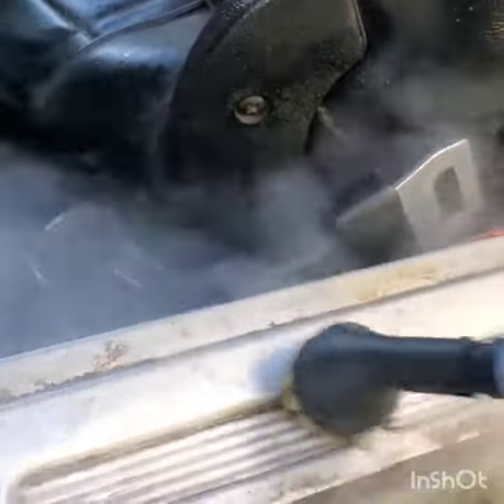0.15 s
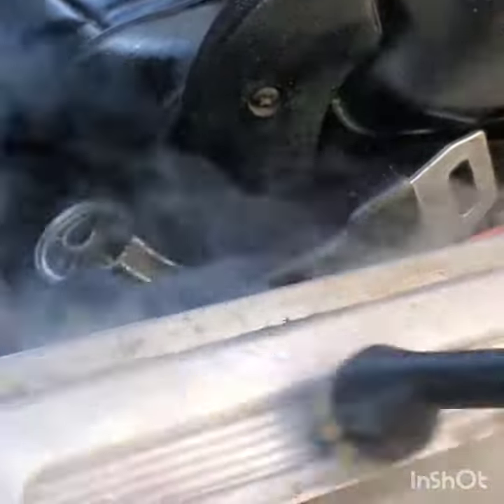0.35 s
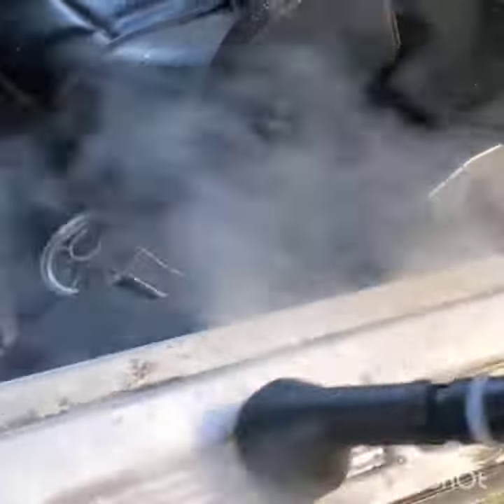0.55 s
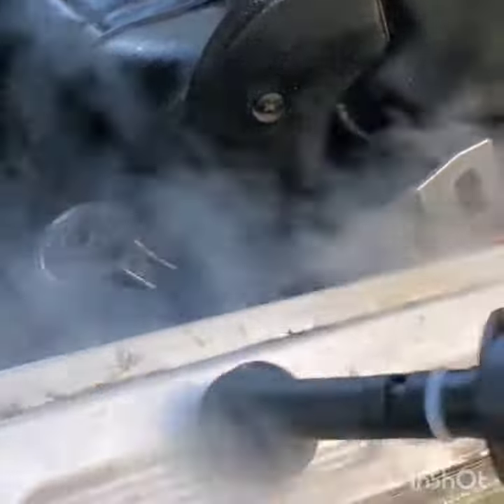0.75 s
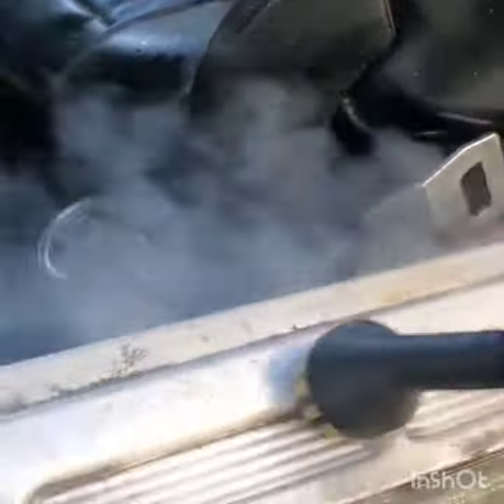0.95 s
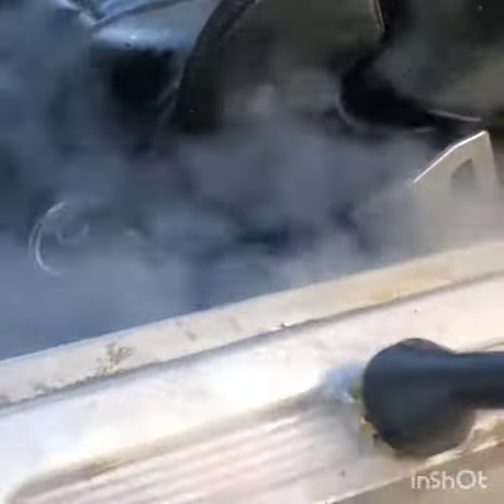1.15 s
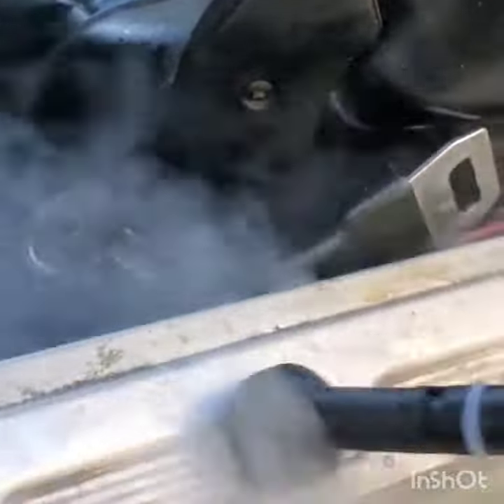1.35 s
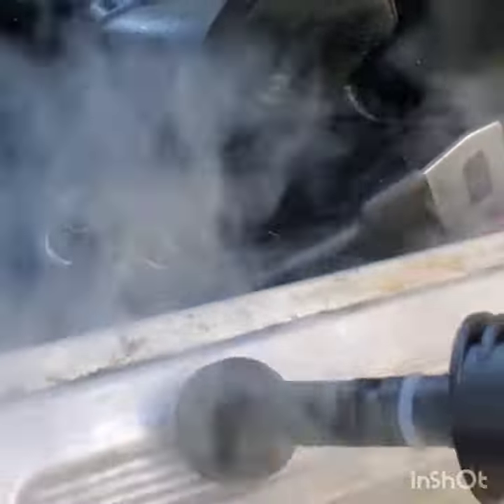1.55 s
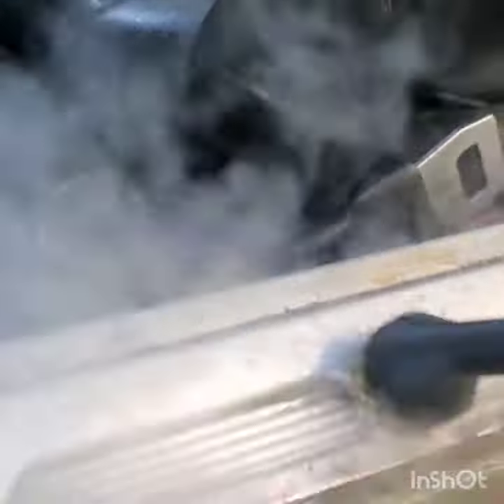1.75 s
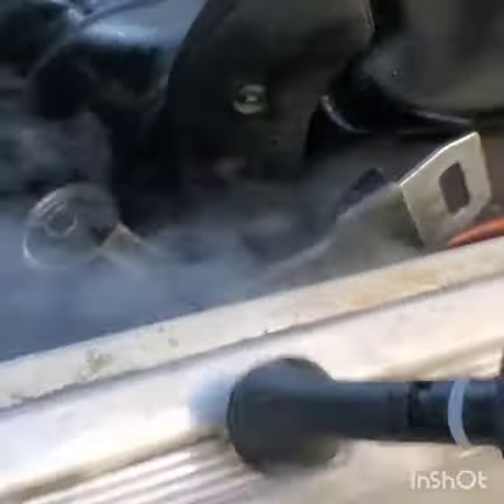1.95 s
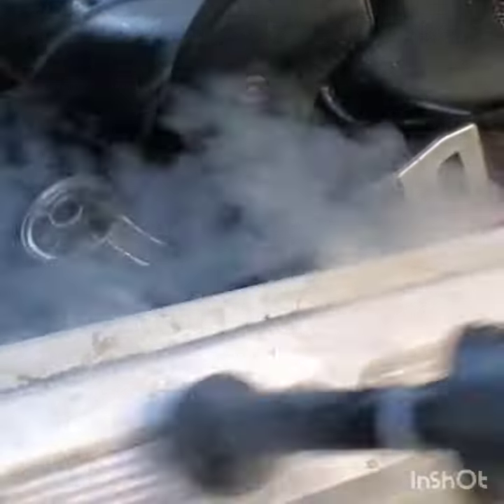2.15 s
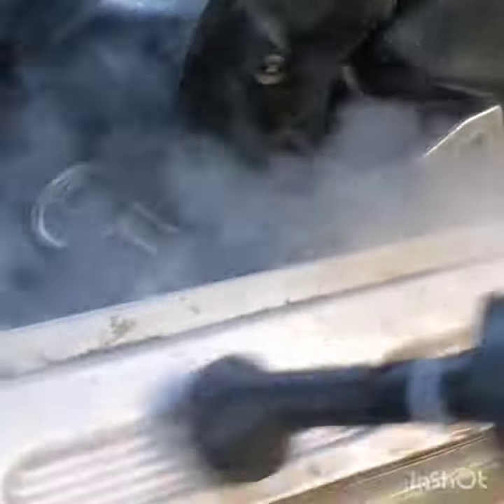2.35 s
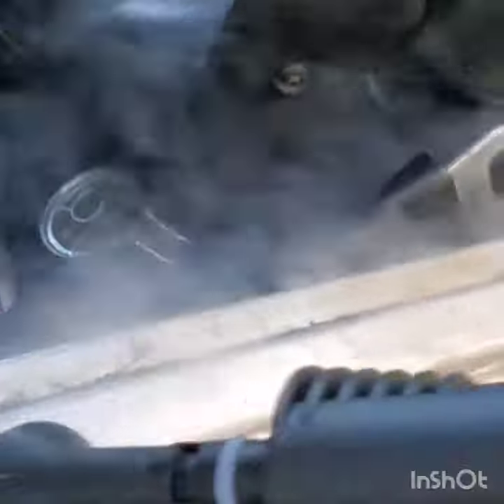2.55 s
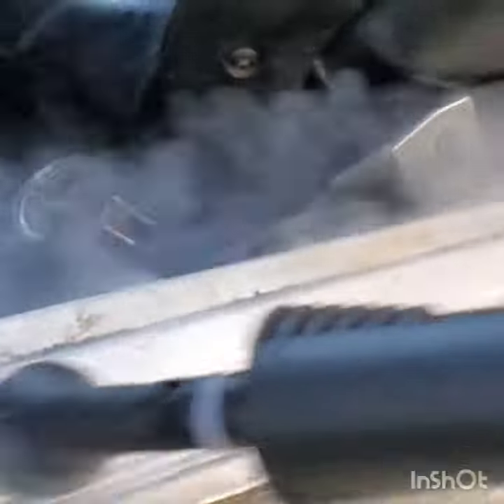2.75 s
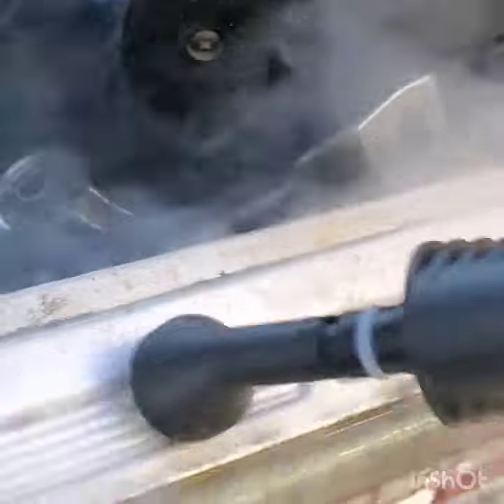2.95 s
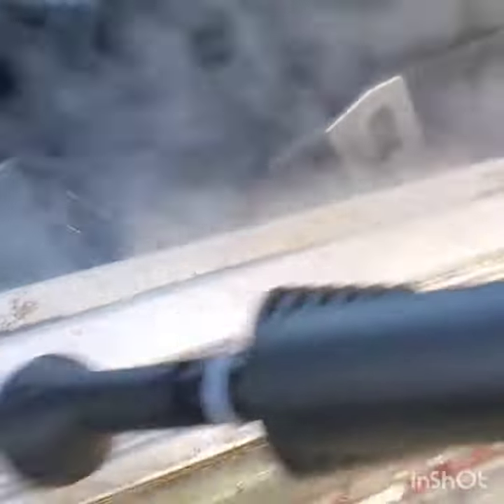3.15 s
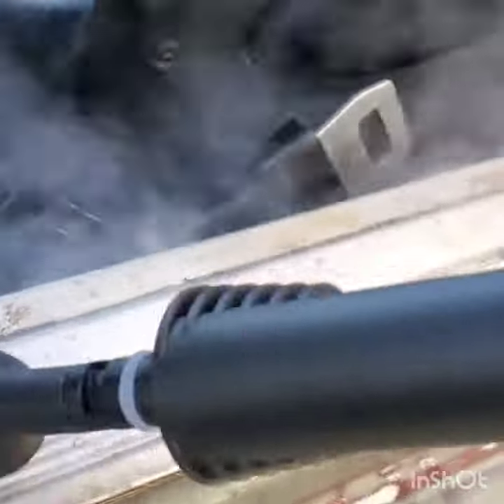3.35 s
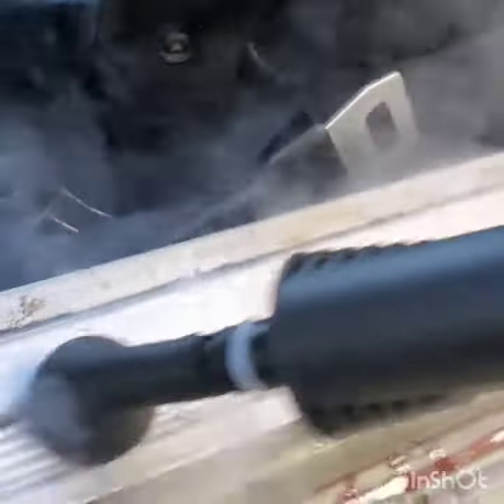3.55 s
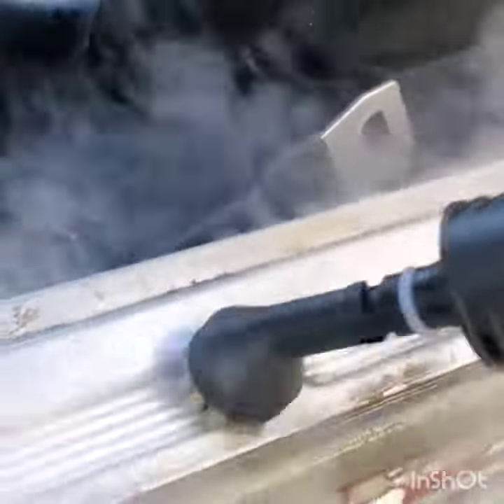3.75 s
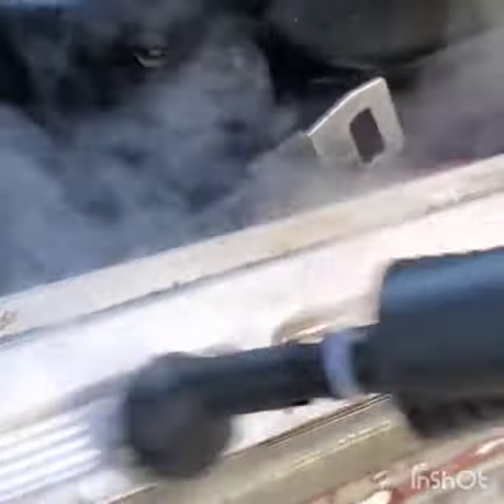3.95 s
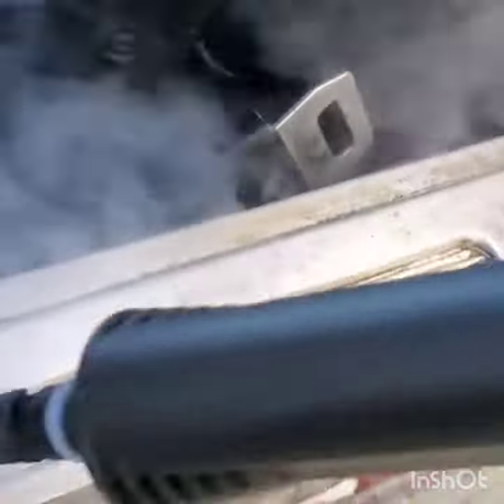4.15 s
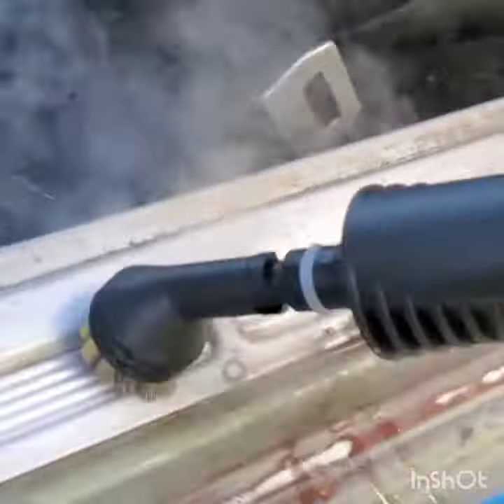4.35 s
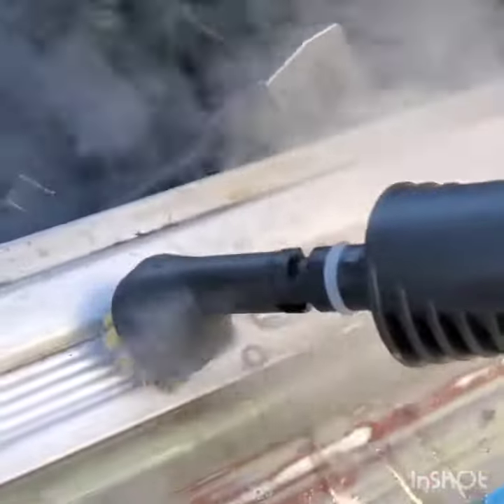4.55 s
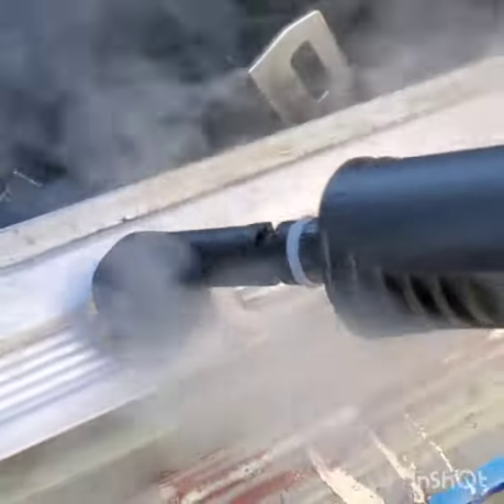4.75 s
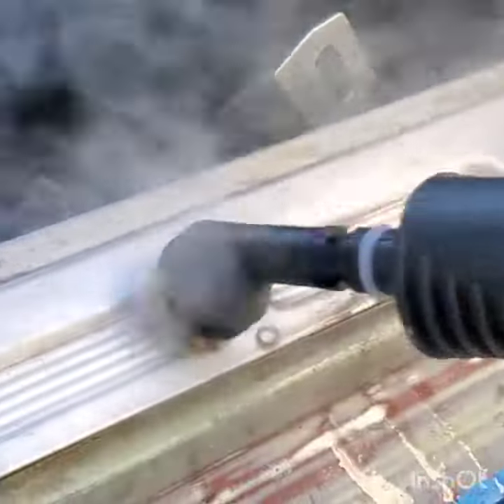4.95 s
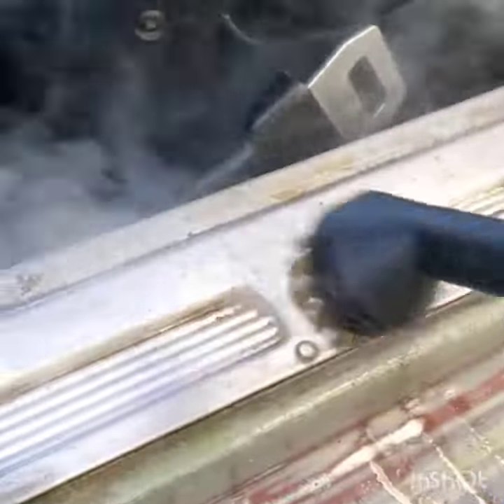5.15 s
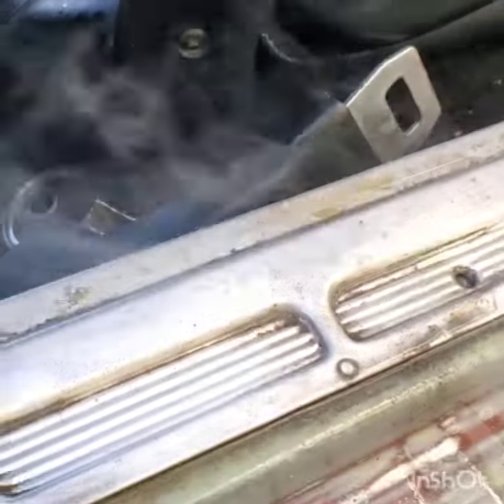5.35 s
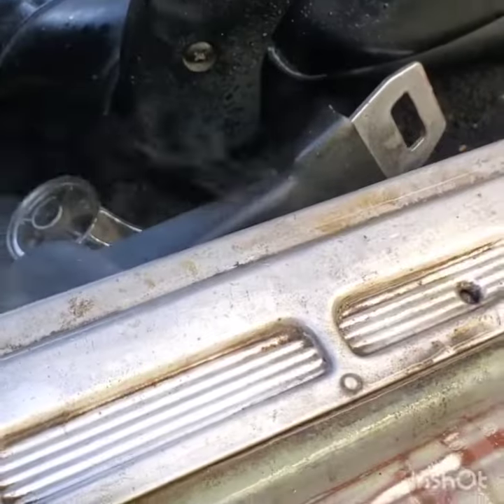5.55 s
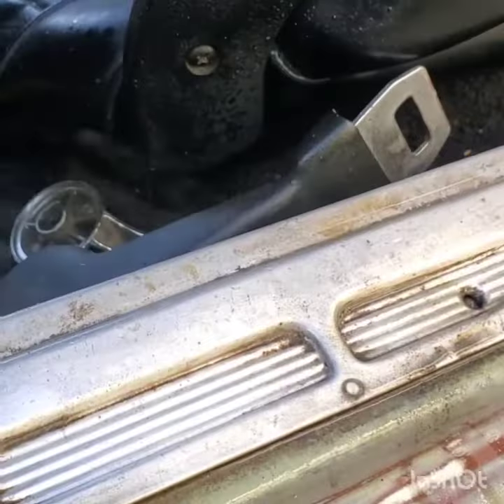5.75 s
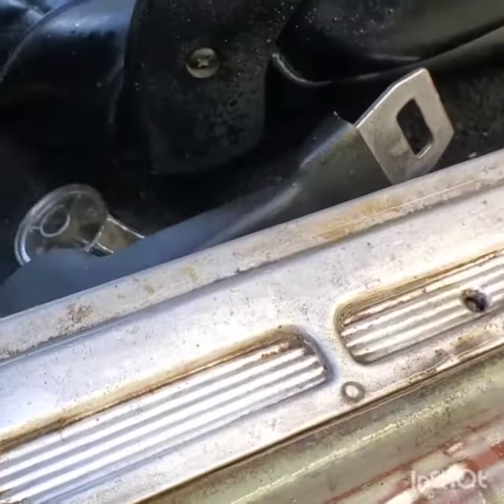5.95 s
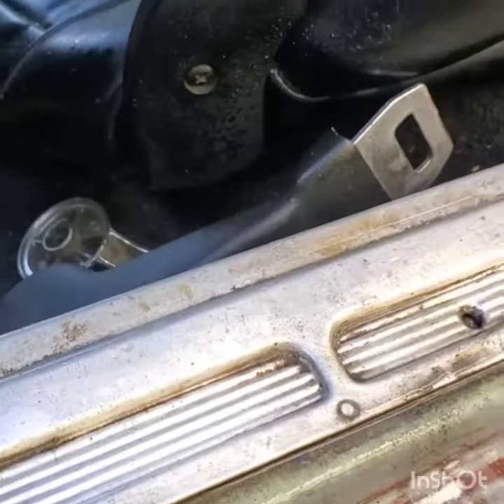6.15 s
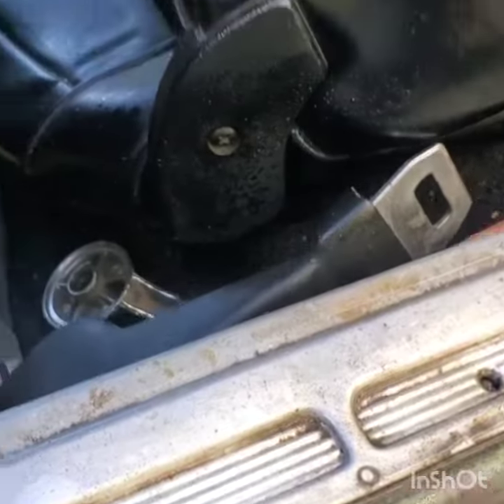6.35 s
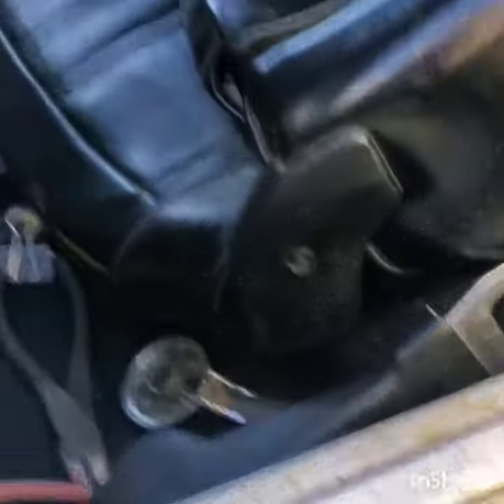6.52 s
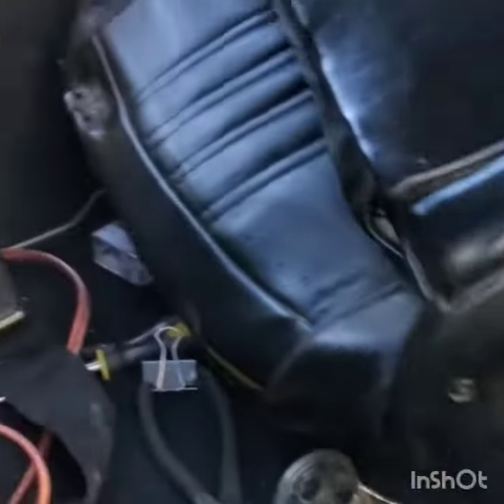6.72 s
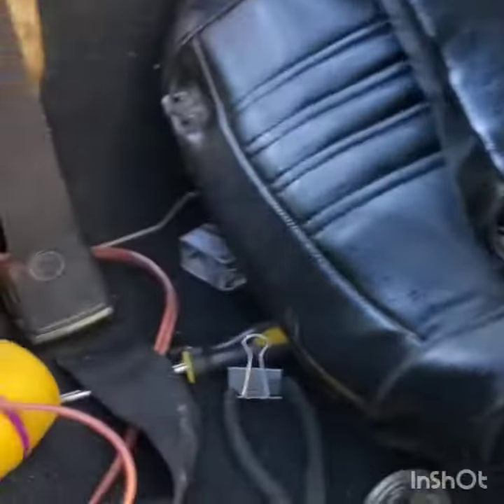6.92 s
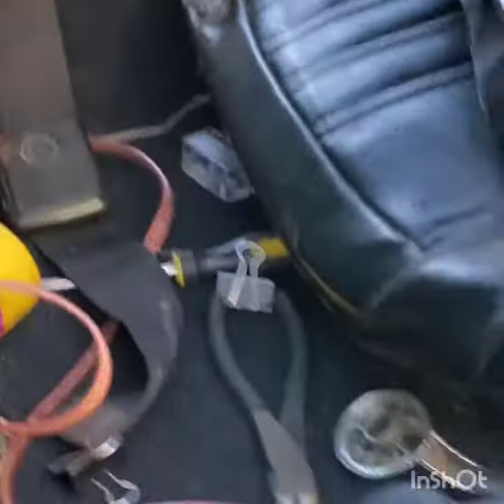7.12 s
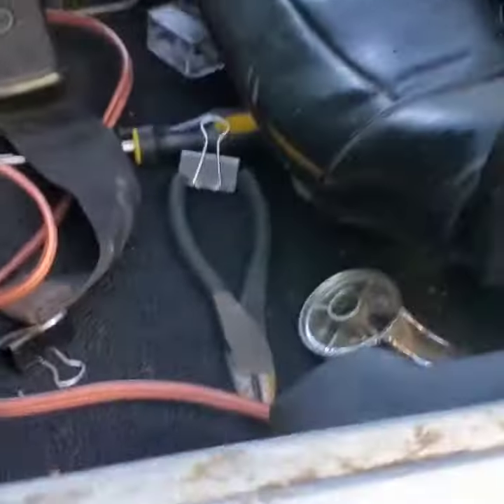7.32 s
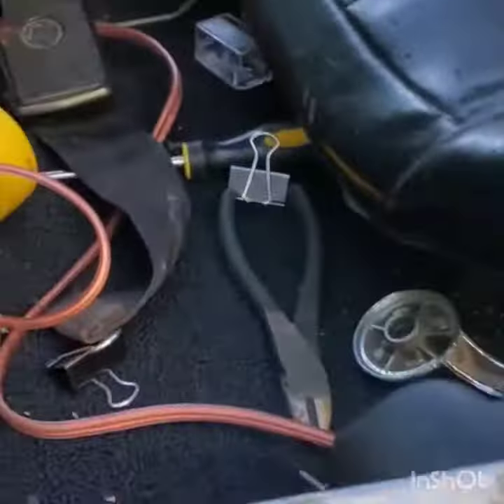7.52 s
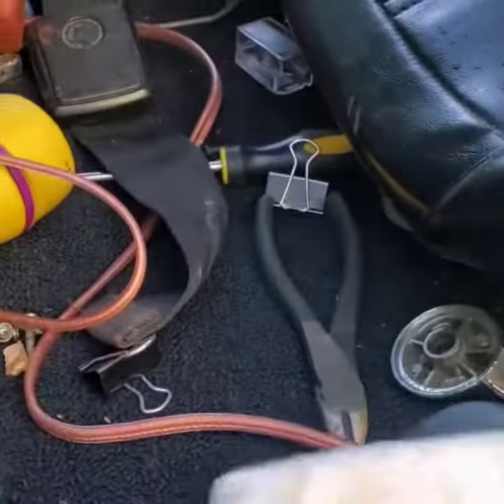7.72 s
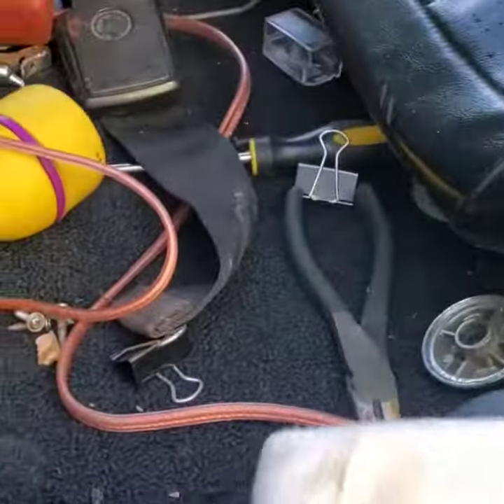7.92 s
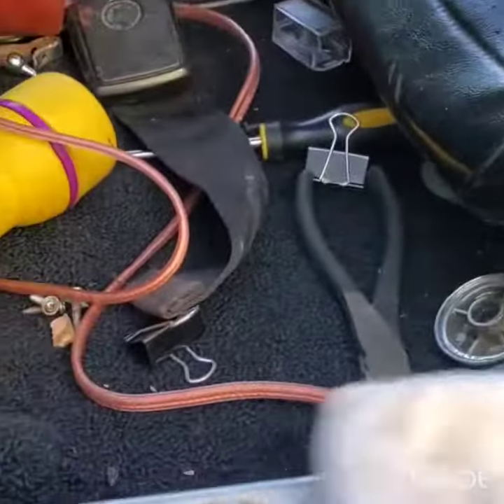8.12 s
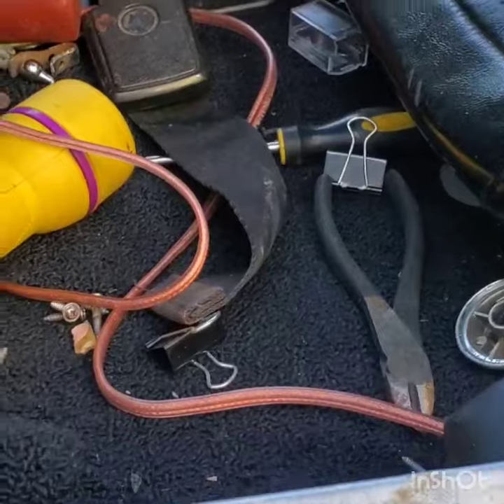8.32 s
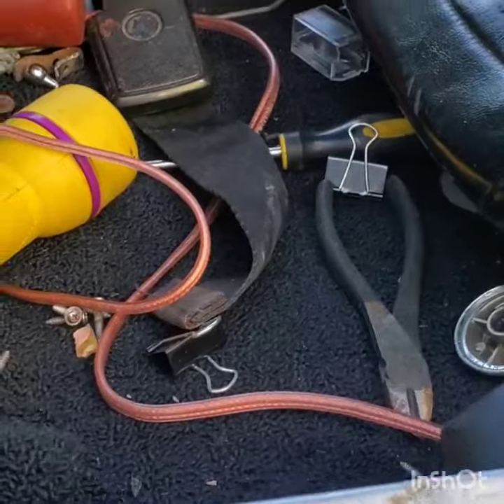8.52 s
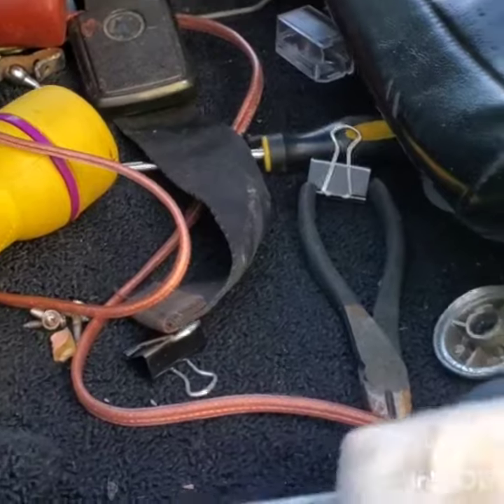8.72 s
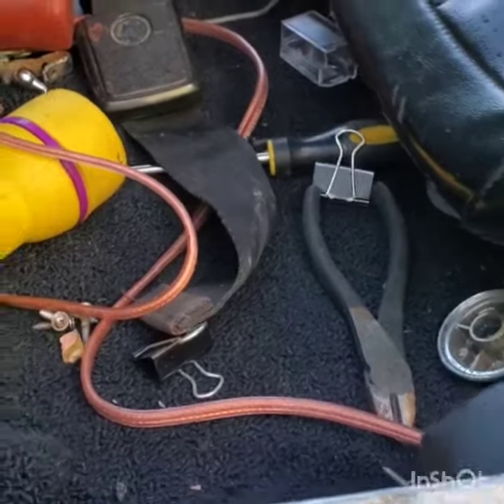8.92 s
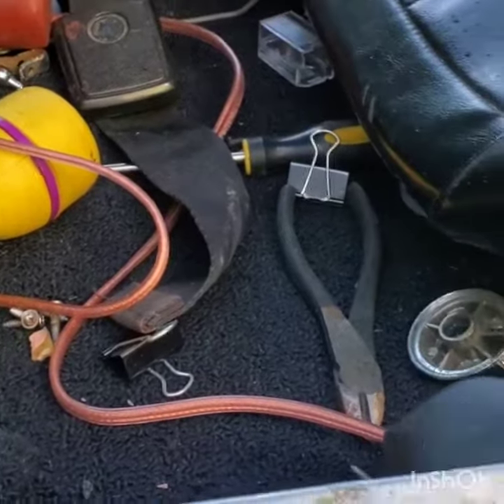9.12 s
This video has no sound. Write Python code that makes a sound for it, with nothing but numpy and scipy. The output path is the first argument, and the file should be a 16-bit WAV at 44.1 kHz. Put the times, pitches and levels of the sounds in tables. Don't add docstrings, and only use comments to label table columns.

```python
import sys
import numpy as np
from scipy import signal
from scipy.fft import rfft, irfft
from scipy.io import wavfile
from scipy.ndimage import uniform_filter1d

SR = 44100
rng = np.random.default_rng(int(sys.argv[2]) if len(sys.argv) > 2 else 0)


def gain_from_db(level_db):
    decades = np.asarray(level_db, float) / 20
    return 10 ** decades


def log_audio(samples):
    frames = np.atleast_2d(samples).T
    limited = np.clip(frames, -1, 1)
    pcm = np.round(limited * 32767).astype(np.int16)
    wavfile.write(sys.argv[1], SR, pcm)


N = 404829

HOP = 128
HZ = np.fft.rfftfreq(4 * HOP, 1 / SR)[:, None]
FRAME_S = np.arange(N // HOP + 5) * HOP / SR
TIME = np.arange(N) / SR

# t/s, jet level/dB
PRESSURE = [
    (0, -24.5),
    (.08, -23),
    (.6, -22.5),
    (1.3, -23),
    (2.3, -22),
    (3.0, -23.5),
    (3.9, -23),
    (4.74, -21.5),
]
# hardest drag t/s, drag level/dB, reach as shortened echo/ms, back-swing surge/dB, turn fizz/dB
STROKES = [(.18, -47, .07, 0, 4.5), (.44, -48.5, .09, 1, -1), (.72, -43.5, .07, 1, 0),
           (.98, -47.5, .04, 1.5, 2), (1.28, -42, .07, 0.5, 2), (1.53, -41, .07, 0.5, -0.5),
           (1.71, -44, 0., 0, 1.5), (1.82, -43, .05, 0.5, -1), (2.16, -41, .19, 1, 2.5),
           (2.44, -37.5, .17, 2, 2), (2.72, -38.5, .1, 2, 1.5), (2.99, -40, .09, 2, 5),
           (3.26, -40.5, .09, 2, 4.5), (3.53, -39.5, .06, 2, -1), (3.82, -48.5, .08, 2, -2.5),
           (3.98, -40, 0., -1, 2.5), (4.12, -56.5, .14, 0., -5.5), (4.26, -47, 0., -0.5, 0.5),
           (4.52, -47.5, 0., -1, -5.5)]
SEEP_S = 4.875


def evened(x):
    return x / np.sqrt(np.mean(x ** 2) + 1e-20)


def read(points, column=1):
    rows = np.array(points)
    return np.interp(np.log(HZ + 1), np.log(rows[:, 0] + 1), rows[:, column])


def curve(rows, x, column=1):
    rows = np.array(rows)
    return np.interp(x, rows[:, 0], rows[:, column])


def bump(t, s, half):
    return np.exp(-((t - s) / half) ** 2)


def gate(rows, fade):
    return np.clip(np.minimum(TIME - rows[0][0], rows[-1][0] - TIME) / fade + 1, 0, 1)


def blotches(wide, long):
    field = rng.standard_normal((len(FRAME_S), len(HZ))).T
    for _ in range(2):
        field = uniform_filter1d(field, max(int(wide), 1), 0)
        field = uniform_filter1d(field, max(int(long), 1), 1)
    return evened(field)


def noise(left, right, same):
    a, b, c, d = rng.standard_normal((len(FRAME_S), len(HZ), 4)).T
    same = np.clip(same, -1, 1)
    shared, own = a + 1j * b, c + 1j * d
    z = np.array([left * shared, right * (same * shared + np.sqrt(1 - same ** 2) * own)])
    return signal.istft(z, nperseg=4 * HOP, noverlap=3 * HOP)[1][:, :N]


def band_rms(x, lo_hz, hi_hz):
    band = signal.butter(4, [lo_hz, hi_hz], "bandpass", fs=SR, output="sos")
    return np.std(signal.sosfilt(band, x.mean(0)))


def steam_gain():
    # t/s, level/dB, half length/s
    cough_rows = [
        (4.752, -30.5, 0.0064),
        (4.77, -24.5, 0.0033),
        (4.795, -23.5, 0.0095),
        (4.813, -26.5, .006),
        (4.827, -25, .006),
        (4.847, -29, 0.0044),
        (4.864, -30, 0.0048),
        (4.888, -47, 0.0044),
        (4.92, -61, .006),
    ]
    surge_late_s, surge_s, smother_db = 0.027, .045, -0.12
    drain_from_db, drain_db_per_s = -34, -66.5
    seep_from_db, seep_db_per_s = -50.5, -150
    sway_db = 0
    for before, (s, _, _, surge_db, _) in zip(STROKES, STROKES[1:]):
        sway_db += surge_db * bump(FRAME_S, (before[0] + s) / 2 + surge_late_s, surge_s)
        sway_db += smother_db * bump(FRAME_S, s, surge_s)
    valve_db = curve(PRESSURE, FRAME_S) + sway_db
    open_valve = gain_from_db(np.interp(TIME, FRAME_S, valve_db)) * gate(PRESSURE, .006)
    coughs = sum(gain_from_db(db - 1.9 * ((TIME - s) / half) ** 2) ** 2 for s, db, half in cough_rows)
    drain_db = drain_from_db + drain_db_per_s * abs(TIME - PRESSURE[-1][0])
    seep_db = seep_from_db + seep_db_per_s * (TIME - SEEP_S)
    seep = gain_from_db(uniform_filter1d(np.where(TIME < SEEP_S, drain_db, seep_db), size=400))
    return np.sqrt(open_valve ** 2 + coughs + seep ** 2)


def jet():
    # f/Hz, left/dB, right/dB
    jet_colour = [(150, -30, -29.5), (519, -26, -27.5), (1040, -19.5, -22), (1835, -17.5, -17.5),
                  (2145, -10.5, -6), (2820, -4, -3), (3840, 4.5, 2), (4300, 0, -10.5), (4800, -1.5, -11.5),
                  (5500, -1, -6), (7540, -3.5, -8.5), (8300, -2, -13), (12600, -4.5, -10), (15600, -3.5, 0)]
    # f/Hz, likeness/0-1, left ahead of right/rad
    mic_pair = [(0, .9, 0), (450, .45, .3), (750, .9, .1), (1250, .8, .2), (1650, .35, .4), (2000, .75, .8),
                (2700, .75, 2.5), (3300, .7, 2.1), (3850, .8, 3.1), (4900, .25, 6.3), (6000, .65, 9.4),
                (7500, .55, 12), (10000, .3, 16.5), (16000, .35, 28.6)]
    # f/Hz, width/Hz, from t/s, to t/s, left/dB, right/dB
    hollows = [(2730, 80, -0.6, .17, -12, -8), (2710, 71, 0.8, 1.43, -15.5, -11.5),
               (2760, 46, 1, 1.5, -5.5, -5), (3970, 110, -1.5, 5.9, -6, -1), (6200, 62, 0, 2.2, -3, -2),
               (8100, 750, 4.5, 7.2, -5.5, -10.5), (4500, 230, -0.5, 6.3, 0.5, 0)]
    turn_lag_s, turn_s = .06, 0.066
    fizz_rest_db, fizz_s, seep_fizz_db = -7.5, .04, -14
    dull_db_per_s, dullest_db, spit_db = -400, -22.5, 5.5
    far_ms, drawn_back_ms, draw_back_s = .85, .05, 3.9
    echo_left, echo_right = .33, .12

    since = FRAME_S - PRESSURE[-1][0]
    fizz_db = fizz_rest_db + sum(db * bump(FRAME_S, s + turn_lag_s, fizz_s) for s, *_, db in STROKES)
    fizz_db = fizz_db + np.clip(dull_db_per_s * since, dullest_db, 0)
    fizz_db = np.where(FRAME_S > SEEP_S + .012, seep_fizz_db, fizz_db) + 4.5
    left_db = fizz_db * np.clip((HZ - 8500) / 4000, 0, 1)
    left_db += (since > 0) * spit_db * np.clip((3200 - HZ) / 1200, 0, 1)
    left_db += 0.51 * blotches(120, 2) + 1.4 * blotches(3, 14) + 0.87 * blotches(40, 8)
    right_db = left_db + read(jet_colour, column=2) + 2.0 * blotches(4, 15)
    left_db += read(jet_colour)
    for hz, width, start, end, left_dip_db, right_dip_db in hollows:
        present = np.clip(np.minimum(FRAME_S - start, end - FRAME_S) / 0.06, 0, 1)
        shape = bump(HZ, hz, width) * present
        left_db = left_db + left_dip_db * shape
        right_db = right_db + right_dip_db * shape

    reach_ms = sum(ms * bump(FRAME_S, s + turn_lag_s, turn_s) for s, _, ms, *_ in STROKES)
    lag_ms = far_ms - reach_ms + drawn_back_ms * np.clip(5 * (FRAME_S - draw_back_s), 0, 1)
    lag = lag_ms / 1000
    echo = np.exp(-2j * np.pi * HZ * lag) * np.clip(HZ / 2500, 0, 1) * np.clip((16000 - HZ) / 5000, .5, 1)
    echo *= 1 - .75 * bump(HZ, 4950, 550)
    sway = 1 + .25 * (lag_ms - .82)
    lead = np.exp(1j * curve(mic_pair, HZ, column=2) * sway)
    left = gain_from_db(left_db) * (1 - echo_left * echo) * lead
    right = gain_from_db(right_db) * (1 - echo_right * echo)
    hiss = noise(left, right, curve(mic_pair, HZ))
    drops = 0.2 * np.minimum(rng.exponential(1, N), 4) * (rng.random(N) < 900 / SR)
    hiss = hiss * (1 + signal.oaconvolve(drops, np.hanning(30), "same"))
    return hiss / band_rms(hiss[:, :4 * SR], 2700, 10000) * steam_gain()


def drag_db(t):
    drag_s, rest_db, fall_db = 0.036, -56, -8
    peaks = sum(gain_from_db(db + fall_db * ((t - s) / drag_s) ** 2) ** 2 for s, db, *_ in STROKES)
    return 10 * np.log10(peaks + gain_from_db(rest_db) ** 2)


def bristles():
    # f/Hz, width/Hz, level/dB
    sill_modes = [(733, 70, -2), (933, 130, 5.5), (800, 84, 1), (1387, 120, 3.5), (237.4, 87, 0)]
    shared, *own = rng.standard_normal((3, N))
    drag = shared + 0.26 * np.array(own)
    drag = drag * gain_from_db(np.interp(TIME, FRAME_S, drag_db(FRAME_S))) * gate(PRESSURE, 0.033)
    t = TIME[:2000]
    drum = np.zeros(len(t))
    for hz, width, db in sill_modes:
        swell = t * width * np.exp(-2 * np.pi * width * t)
        drum += gain_from_db(db) * np.sqrt(width) * swell * np.sin(2 * np.pi * hz * t)
    return signal.oaconvolve(drag, drum[None] / np.linalg.norm(drum), axes=1)[:, :N]


def car_cabin(steam):
    t = TIME[:12000]
    cabin = rng.standard_normal((2, len(t))) * gain_from_db(-60 * t / 0.083)
    return gain_from_db(-26.5) * signal.oaconvolve(steam, cabin / np.linalg.norm(cabin[0]), axes=1)[:, :N]


def gain_control_db():
    under_db, creep_db_per_s, held_db, free_db = -59.5, 1.06, -58, -46
    hold_s, recover_s, recover_half_s = 5.02, 6.1, .25
    under = np.where(TIME < hold_s, under_db + creep_db_per_s * TIME, held_db)
    under = uniform_filter1d(under, size=9000)
    return under + (free_db - held_db) * (.5 + .5 * np.tanh((TIME - recover_s) / recover_half_s))


def yard():
    # f/Hz, density/dB per Hz
    yard_colour = [(15, -45), (25, -21.5), (55, -1.5), (108, -1), (141, -13.5), (335, -14), (476, -20.5),
                   (560, -19.5), (911, -15.5), (2000, -30), (2550, -36), (6900, -40), (7900, -53),
                   (15900, -57)]
    # f/Hz, likeness/0-1
    yard_same = [(30, .7), (60, .82), (140, .94), (300, .88), (640, .55), (1400, .27), (3000, .05)]
    log_hz = np.log(np.fft.rfftfreq(N, 1 / SR) + 1)
    colour_hz, colour_db = np.transpose(yard_colour)
    same_hz, likeness = np.transpose(yard_same)
    same = np.clip(np.interp(log_hz, np.log(same_hz), likeness), 0, 1)
    a, b = rfft(rng.standard_normal((2, N)))
    pair = np.array([a, same * a + np.sqrt(1 - same ** 2) * b])
    wash = irfft(pair * gain_from_db(np.interp(log_hz, np.log(colour_hz), colour_db)), N)
    treble = signal.sosfiltfilt(signal.butter(2, 1500, "highpass", fs=SR, output="sos"), wash)
    wash = wash + treble * (gain_from_db(-4 * bump(TIME, 5.42, .12)) - 1)
    return wash / band_rms(wash, 18, 16000) * gain_from_db(gain_control_db() + np.array([[-.4], [.4]]))


def bird():
    # t/s, level/dB
    calls = [
        (5.085, -73),
        (5.802, -65),
        (6.583, -51.5),
    ]
    # delay/s, length/s, first f/Hz, last f/Hz, level/dB
    slurs = [
        (0, .04, 4200, 4050, 3),
        (.022, .07, 3700, 3480, 1),
        (.05, .085, 3200, 3070, -1),
    ]
    out = np.zeros(N)
    warble_hz = 200 * evened(uniform_filter1d(rng.standard_normal(N), size=60))
    for s, call_db in calls:
        for delay, length, first_hz, last_hz, db in slurs:
            u = np.clip((TIME - s - delay) / length, 0, 1)
            hz = first_hz + (last_hz - first_hz) * u + warble_hz
            out += gain_from_db(call_db + db) * np.sin(np.pi * u) * np.sin(2 * np.pi * np.cumsum(hz) / SR)
    t = TIME[:4000]
    smear = rng.standard_normal((2, len(t))) * gain_from_db(-60 * t / 0.24)
    smear = smear * (rng.random((2, len(t))) < .03)
    return signal.oaconvolve(out[None], smear / np.linalg.norm(smear[0]), axes=1)[:, :N]


def friction(rows, colour, lo_hz):
    tilt_db = curve(rows, FRAME_S, column=2) - np.mean(np.array(rows)[:, 2])
    shape = read(colour) + 0.78 * tilt_db * np.clip((8000 - HZ) / 3000, 0, 1) + blotches(150, 1)
    rub = noise(gain_from_db(shape + 1.7 * blotches(7, 10)), gain_from_db(shape + 2.3 * blotches(4.5, 12)), 0.14)
    return rub / band_rms(rub, lo_hz, 16400) * gain_from_db(curve(rows, TIME)) * gate(rows, .03)


def clothes():
    # f/Hz, density/dB per Hz
    rustle_colour = [(1180, -11), (2000, 7.5), (2240, -0.5), (3310, 1), (4410, 0.5), (4990, -0.5),
                     (7910, -12), (13700, -6.5), (16000, -3)]
    # peak t/s, level/dB, length/s, tilt toward the low treble/dB
    rustles = [(5.536, -78, .03, 5), (5.705, -66.5, 0.032, -11), (5.777, -71, .05, -9), (6.07, -76, .02, 6),
               (6.534, -59, 0.055, -2.5), (6.648, -64.5, .02, 6), (6.827, -61.5, 0.055, -1),
               (6.93, -68.5, 0.076, 2.5), (7.135, -65, 0.056, -3), (7.223, -69, .03, 4),
               (7.321, -65, .002, 0), (7.4, -76, .06, 6)]
    rise_db_per_s, fall_db_per_s = 330, 220
    edge_tilt, idle_tilt_db = 0.65, 8.3
    t = FRAME_S[(FRAME_S > 5.45) & (FRAME_S < 7.66)]
    idle_db = np.clip(-100 + 36 * (t - 5.88), -100, -81)
    levels, tilts = [idle_db], [idle_tilt_db + 0 * t]
    for s, db, length, tilt_db in rustles:
        below_db = rise_db_per_s * np.maximum(s - length / 2 - t, 0)
        below_db += fall_db_per_s * np.maximum(t - s - length / 2, 0)
        levels.append(db - below_db)
        tilts.append(tilt_db + edge_tilt * below_db)
    loudest = np.argmax(levels, axis=0)[None]
    tilt = np.take_along_axis(np.array(tilts), loudest, axis=0)[0]
    return friction(np.transpose([t, np.max(levels, axis=0), tilt]), rustle_colour, 8000)


def ticks():
    # t/s, peak level/dB, ring f/Hz, left-right/dB, t60/s, snap dull above f/Hz
    tick_rows = [
        (5.535, -51.5, 450, -2, .06, 6000),
        (5.559, -55, 680, 0, .04, 5000),
        (5.59, -62, 1610, -9, .04, 5000),
        (7.2727, -33, 3850, -21.5, 0.0018, 15000),
        (7.321, -56, 12000, -2, 0.004, 15000),
        (7.553, -55, 2000, -5, 0.022, 5000),
        (7.681, -51, 1510, -1, .02, 5000),
        (8.126, -48, 2000, 2, .02, 8900),
        (8.523, -55, 2080, 0, .02, 9000),
        (8.9385, -47, 3500, 2, .015, 12000),
    ]
    out, t = np.zeros((2, N)), TIME[:3000]
    snaps = rng.standard_normal((len(tick_rows), 2, len(t)))
    for snap, (s, db, hz, pan_db, t60, dull_hz) in zip(snaps, tick_rows):
        band = signal.butter(2, [.7 * hz, dull_hz], "bandpass", fs=SR, output="sos")
        snap = signal.sosfilt(band, snap)
        tick = (snap + 1.5 * np.sin(2 * np.pi * hz * t)) * gain_from_db(db - 60 * t / t60)
        out[:, round(s * SR):][:, :len(t)] += tick * gain_from_db(np.array([[pan_db / 2], [-pan_db / 2]]))
    return out


def knock():
    # t/s, level/dB
    blows = [
        (7.7204, -14),
        (7.7225, 1),
        (7.724, -23),
        (7.7283, -7),
        (7.7348, -10.5),
    ]
    # f/Hz, level/dB, t60/s
    body_modes = [(237, -10.5, 0.29), (349, -16, 0.31), (476, -11, 0.11), (670, -8.5, 0.088),
                  (810, 3, 0.063), (970, -17, 0.24), (1230, -4, 0.055), (1660, -29, .07), (2000, -27, .06),
                  (2680, -8, 0.065), (3560, -17, .07), (5420, 0.5, 0.03)]
    # f/Hz, density/dB per Hz
    crack_colour = [(100, -46), (200, -21), (400, -10.5), (837, -9.5), (1300, -11.5), (2700, -15.5),
                    (3160, -25), (3700, -17.5), (5400, -19.5), (8900, -28), (14200, -27.5), (16000, -34)]
    # f/Hz, t60/s
    tail_decay = [(150, 0.49), (400, 0.15), (1000, 0.089), (2800, 0.12), (7300, 0.12), (15000, 0.14)]
    t, hits = TIME[:9000], np.zeros(N)
    for s, db in blows:
        hits[round(s * SR)] = gain_from_db(db)
    ring = sum(gain_from_db(db - 60 * t / t60) * np.sin(2 * np.pi * hz * t) for hz, db, t60 in body_modes)
    push = 0.3 * bump(t, .0004, 0.000078) - bump(t, .0008, 0.00012)
    struck = signal.oaconvolve(hits, gain_from_db(-21.5) * ring + gain_from_db(-4.5) * push)[:N]
    since = FRAME_S - blows[1][0]
    shape = gain_from_db(read(crack_colour) - 60 * np.maximum(since, 0) / read(tail_decay)) * (since > -.02)
    burst = noise(shape, shape, 0.45)
    burst *= np.clip((TIME - blows[0][0]) / .002, 0, 1)
    return struck * gain_from_db(np.array([[1.], [-1.]])) + gain_from_db(-10.0) * burst / np.abs(burst).max()


def cloth():
    # f/Hz, density/dB per Hz
    cloth_colour = [(760, -29), (1300, -2), (1550, -8.5), (1980, -1.5), (2550, -5), (5960, -4), (7430, -13),
                    (10700, -8.5), (16000, -9)]
    # start t/s, length/s, level/dB, tilt/dB
    wipes = [
        (8.118, 0.2, -58.5, 3),
        (8.533, 0.09, -55.5, -1),
        (8.738, 0.092, -57, 2),
        (8.916, 0.071, -55, 0.5),
        (9.088, .08, -54, -2),
    ]
    press_db, edge_db, hover_db = 5.5, -8.5, -92.5
    land_s, lift_s, hover_s = 0.0074, 0.015, 0.056
    t = FRAME_S[FRAME_S > 8.03]
    strokes = []
    for s, length, db, _ in wipes:
        corners_s = [-land_s - hover_s, -land_s, 0, length, length + lift_s, length + lift_s + hover_s]
        corners_db = [hover_db, db + edge_db, db, db + press_db, db + edge_db, hover_db]
        strokes.append(np.interp(t - s, corners_s, corners_db))
    db = np.max(strokes, axis=0)
    tilt = np.array(wipes)[np.argmax(strokes, axis=0), 3] - 0.16 * db
    return friction(np.transpose([t, db, tilt]), cloth_colour, 6800)


def scene():
    steam = jet() + bristles()
    steam = steam + car_cabin(steam)
    return steam + yard() + bird() + clothes() + ticks() + knock() + cloth()


def starve(x, turn):
    margin_db, depth_db = -5.4, -30.5
    hz, _, z = signal.stft(turn @ x, SR, nperseg=2048, noverlap=1536)
    narrow = uniform_filter1d(uniform_filter1d(abs(z) ** 2, size=6, axis=1), size=3, axis=2)
    narrow_db = 10 * np.log10(abs(narrow) + 1e-20)
    around_db = uniform_filter1d(narrow_db, size=50, axis=1)
    weak = (narrow_db < around_db + margin_db) & (hz[:, None] > 2400)
    weak = uniform_filter1d(uniform_filter1d(1. * weak, size=4, axis=1), size=2, axis=2) > .1
    z = z * np.where(weak, gain_from_db(depth_db), 1)
    return turn @ signal.istft(z, SR, nperseg=2048, noverlap=1536)[1][:, :N]


def top_cut(x):
    return signal.sosfilt(signal.butter(12, 17090, fs=SR, output="sos"), x)


def record(dry):
    edge = signal.firwin(401, 15800, window=("kaiser", 9), fs=SR)
    mix = signal.oaconvolve(dry, edge[None], "same", axes=1)
    middle_side = np.array([[1, 0.96], [1, -0.97]]) / np.sqrt(2)
    for turn in (np.eye(2), middle_side):
        mix = starve(mix, turn)
    return top_cut(mix)


dry = scene()
out = record(dry)
log_audio(out)
```